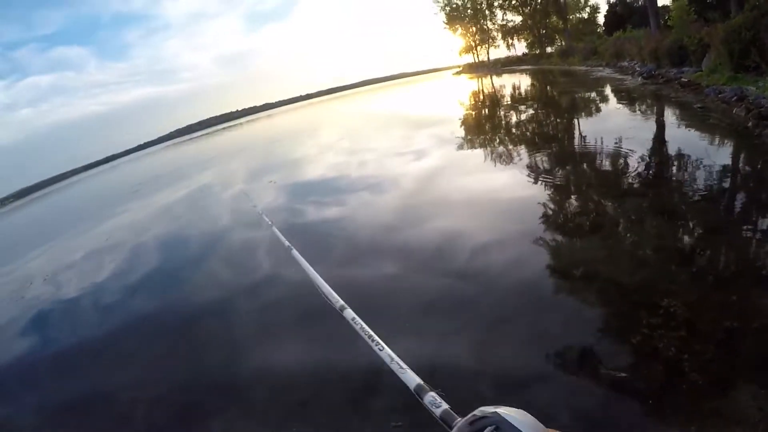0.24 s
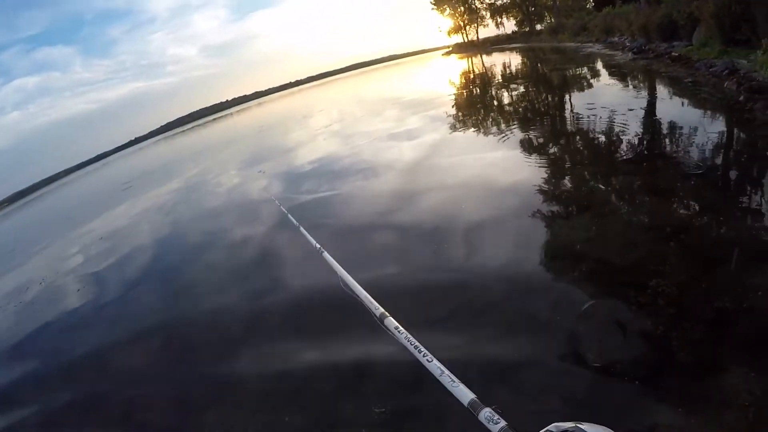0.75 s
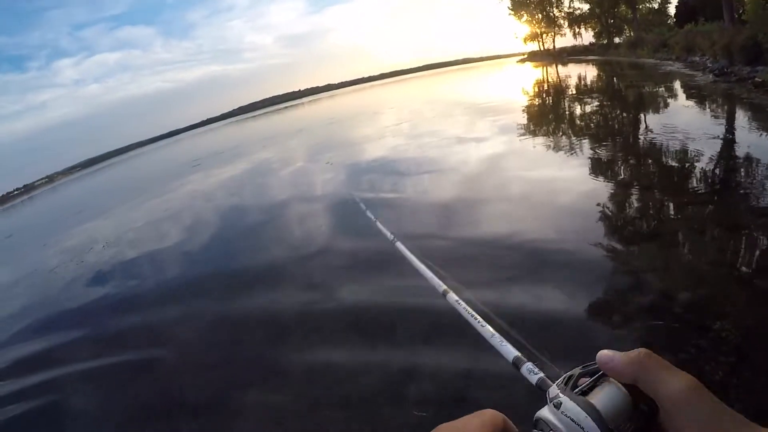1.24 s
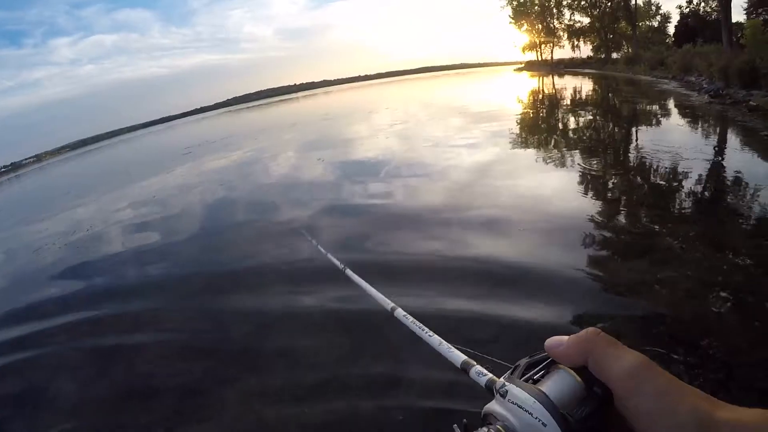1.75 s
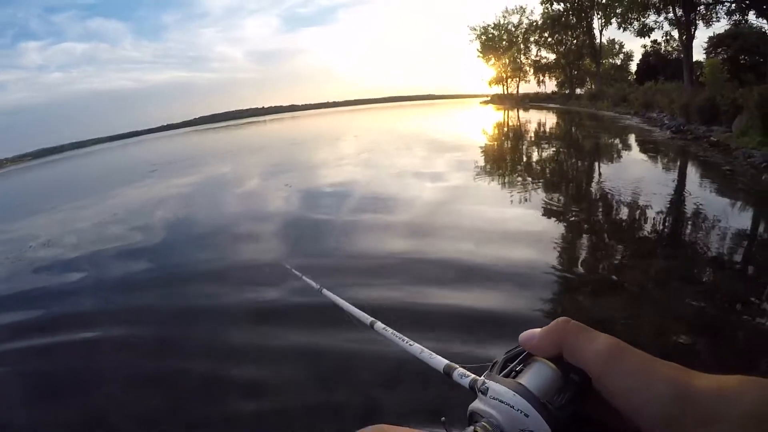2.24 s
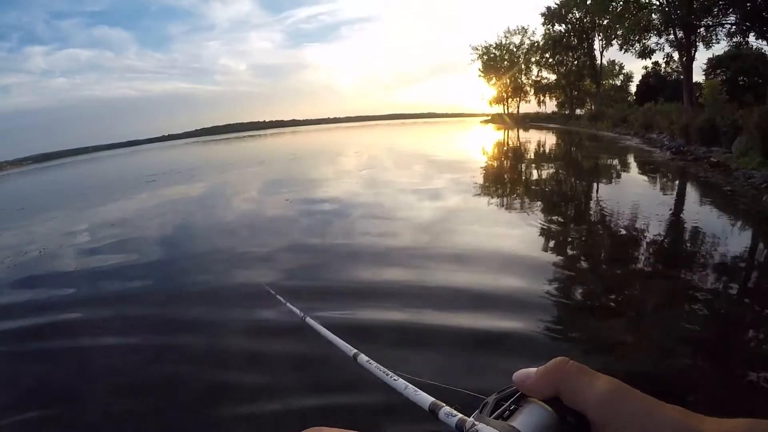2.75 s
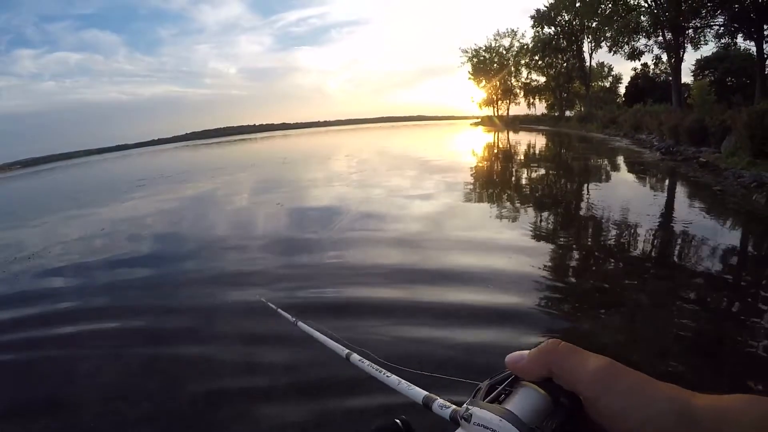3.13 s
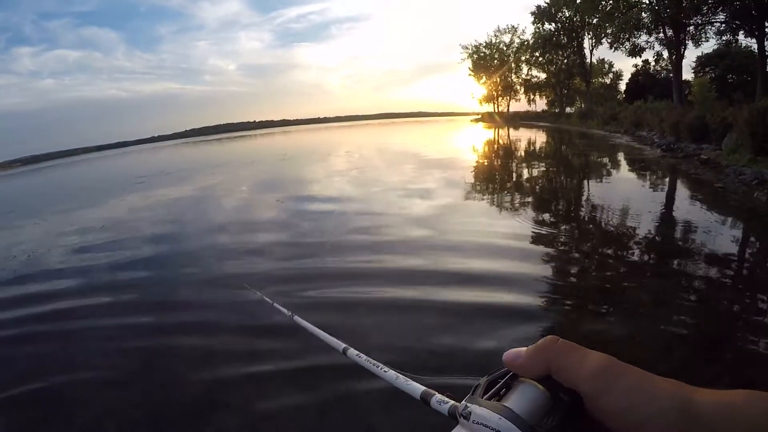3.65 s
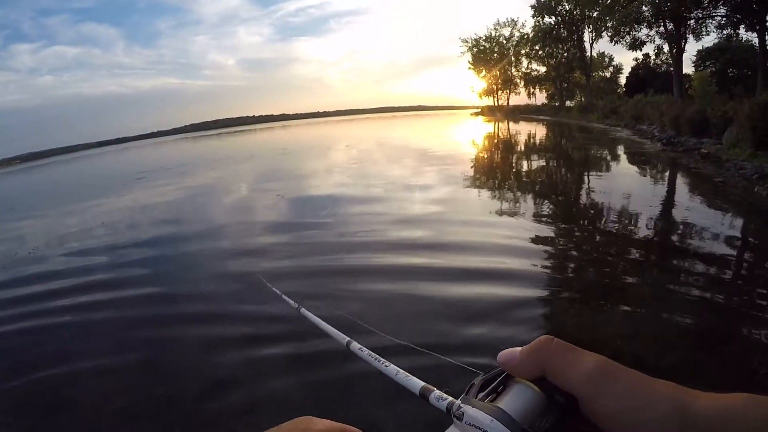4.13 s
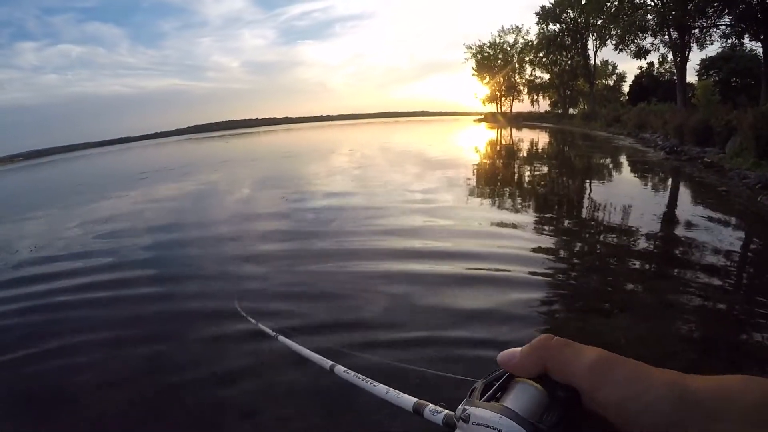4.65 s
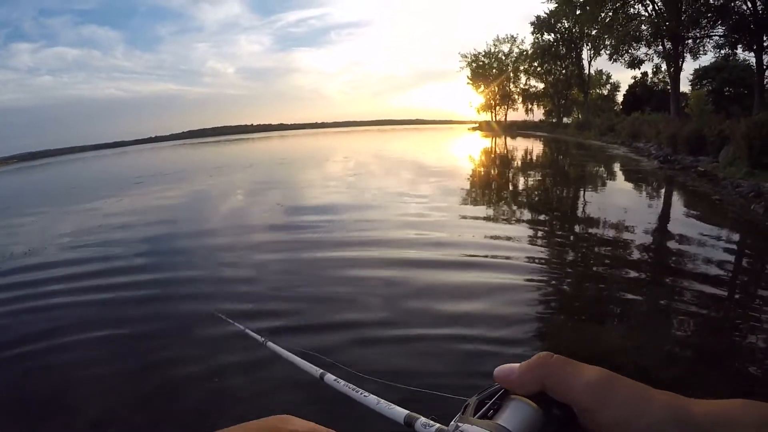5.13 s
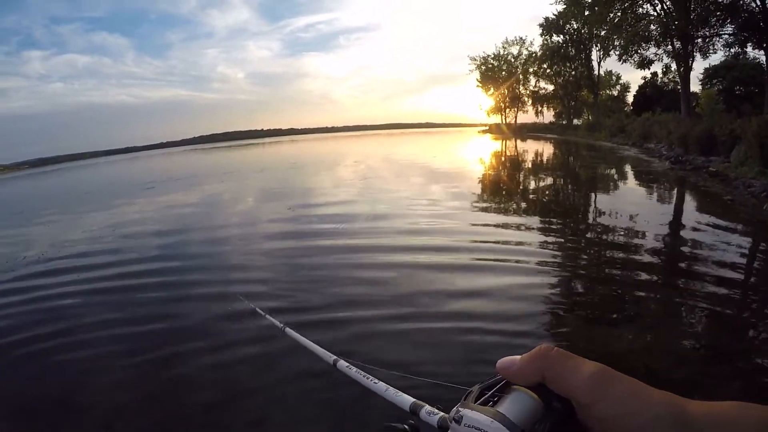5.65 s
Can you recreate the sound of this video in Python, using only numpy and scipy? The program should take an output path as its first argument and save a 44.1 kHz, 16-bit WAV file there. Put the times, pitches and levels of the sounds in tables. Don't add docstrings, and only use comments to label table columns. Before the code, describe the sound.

Water slops and drips off fishing tackle, a reel latch snaps sharply, then faint handle knocks and gear ticks under wind rumble and distant cicadas.

```python
import sys
import numpy as np
from scipy import signal
from scipy.io import wavfile
from scipy.ndimage import uniform_filter1d

SR = 44100
rng = np.random.default_rng(int(sys.argv[2]) if len(sys.argv) > 2 else 0)


def elevation(decibels):
    levels = np.asarray(decibels, float)
    return 10 ** (levels / 20)


def to_wav(s):
    ch = np.atleast_2d(s).T
    pcm = np.round(np.clip(ch, -1, 1) * 32767)
    wavfile.write(sys.argv[1], SR, pcm.astype(np.int16))


N = 259749

# (frequency [Hz], density [dB per Hz])
AIR_SPECTRUM = [(12, -30), (20, -1.5), (70, -0.5), (92, -4), (119, -4.5), (191, -13.5), (237, -13),
                (356, -19), (396, -19.5), (584, -26), (664, -27.5), (724, -28.5), (806, -27.5),
                (1410, -39.5), (3400, -46), (4420, -70), (7480, -120)]
# (time [s], wind level [dB])
GUSTS = [(0.0, -38), (0.57, -39), (0.7, -34.5), (1.4, -40.5), (1.6, -36.5), (1.88, -42.5), (2.66, -37.5),
         (3.1, -35.5), (3.33, -39), (3.65, -33.5), (3.84, -42), (4.04, -36.5), (4.2, -40), (4.82, -35),
         (5.28, -36.5), (5.77, -39), (5.89, -35)]
# (frequency [Hz], width [Hz], level [dB])
MOANS = [
    (68.7, 9.8, -49),
    (111.3, 5.3, -51),
    (237.7, 12.1, -58),
    (398.7, 9.4, -70.5),
]
# (frequency [Hz], density [dB per Hz])
HISS_SPECTRUM = [(1500, -14), (3000, 1), (10000, 7), (13000, 4), (15500, 1.5)]
# (frequency [Hz], density [dB per Hz])
CHORUS_SPECTRUM = [(3000, -35), (3400, -17), (3900, -13.5), (4150, -7.5), (4350, -6.5), (4650, -2.5),
                   (5400, -6), (6000, -2), (6650, 1), (7100, -3.5), (7700, -3.5), (8500, -8.5), (9300, -12),
                   (9900, -25), (10500, -34)]
# (time [s], level [dB], tilt [dB per octave])
CHORUS_SWELL = [(0.0, -55, 1), (0.28, -53, -1.5), (0.65, -51.5, -2), (2.1, -51.5, -0.5), (3.23, -50.5, 0),
                (5.35, -50.5, 0.5), (5.89, -51, -0.5)]
# (time [s], lead over the mean beat [throbs])
SONG_LEAD = [(0, -.35), (1, -.05), (2, .33), (3, .6), (3.8, .78), (4.5, .75), (5.89, .43)]
# (frequency [Hz], level [dB])
SONG_BANDS = [
    [(4678, -78), (5120, -69), (6325, -64.5), (6551, -70), (6751, -63.5), (7214, -72), (7725, -88)],
    [(4576, -69.5), (4640, -69.5), (6245, -90), (6659, -66), (6770, -74.5), (7230, -63.5), (7429, -69),
     (7768, -82)],
    [(4651, -67), (4813, -77), (5701, -67.5), (5879, -66), (6514, -74), (6700, -78), (7400, -70),
     (8027, -70.5)],
]
FACING_TIMES = [0.91, 2.75, 5.1]
# (frequency [Hz], density [dB per Hz])
WATER_SPECTRUM = [(180, -37), (300, -13), (376, -29), (405, -7.5), (605, -2.5), (871, -4.5), (950, -3.5),
                  (1320, -4.5), (1490, -7), (2150, -6.5), (2370, -10.5), (3460, -16), (6000, -14.5),
                  (7800, -48), (13200, -120)]
# (peak time [s], gurgle level [dB], drain t60 [s], spray level [dB])
SURGES = [
    (0.0, -51, 1.2, -74),
    (0.095, -49, 0.062, -70),
    (.128, -53, 0.62, -80),
    (.392, -49, 3.7, -77),
    (.488, -32.5, 0.066, -61),
    (.506, -40.5, 1.15, -65),
    (.698, -40.5, 0.54, -60),
    (0.865, -42, 0.31, -66),
    (.905, -48, 0.16, -77.5),
    (.94, -66, 0.41, -72),
]
# (time [s], peak level [dB], starting frequency [Hz], pitch rise [per t60])
DRIPS = [
    (.000, -41, 1700, .15),
    (.048, -40, 680, .05),
    (0.091, -27, 1174, .85),
    (.122, -39, 1500, 0.067),
    (.126, -32, 940, .21),
    (.160, -39, 1760, 0),
    (.203, -46, 1600, 0.26),
    (.229, -43.5, 1280, .1),
    (5.180, -48, 3400, 0.),
]
# (time [s], peak level [dB], frequency [Hz])
SMACKS = [(.033, -38, 2750), (.052, -39, 2700), (.089, -44, 2500), (.121, -40, 3000), (.147, -42, 3100),
          (.408, -38, 1870), (.4225, -29, 430), (.41, -43, 330), (.4595, -35, 5000), (.4765, -33.5, 2420),
          (.4765, -28, 3880), (.4765, -32, 1100), (.5267, -29.5, 2000), (.528, -26, 3900),
          (.5606, -30, 5000), (.58, -45, 2800), (.599, -39, 2900), (.638, -41, 3500), (.727, -34, 2800),
          (.7824, -37, 2600), (.8, -42, 3200), (.816, -31, 2500), (.8485, -41, 2800)]
# (time [s], peak level [dB], frequency [Hz])
SPITS = [(.0882, -35, 14300), (.1905, -48, 12000), (.4339, -49, 10100), (.4938, -39, 10100),
         (.5636, -45, 12100), (.7073, -41, 12700), (.7617, -49, 10400), (2.1986, -46, 13300),
         (5.5323, -50, 14300)]
# (time [s], peak level [dB], starting frequency [Hz])
BUBBLES = [(.385, -33.5, 860), (0.388, -35, 1200), (0.4068, -29, 1780), (.414, -31, 333),
           (.420, -29.5, 520), (.432, -27.5, 536), (.456, -29.5, 780), (.468, -32, 1700), (0.477, -29, 443),
           (.482, -24.5, 1500), (.489, -31, 724), (0.489, -30, 1500), (.501, -35, 340), (.506, -40, 2370),
           (.521, -32, 820), (.556, -30.5, 520), (0.559, -32, 1530), (.577, -33, 670), (.620, -33, 1190),
           (.637, -33, 2240), (.695, -23, 594), (.697, -33.5, 2900), (.719, -34, 2400), (0.73, -28, 1380),
           (.767, -37, 720), (.774, -30.5, 1620), (.815, -33, 1500), (.824, -34, 2900), (.870, -32, 1770)]
# (time [s], crack level [dB], body level [dB], crack t60 [s])
LATCH_BLOWS = [
    (.8661, -29, -50, 0.012),
    (.8846, -14.5, -50, 0.0059),
    (.8858, -15, -40, .020),
    (.8889, -6.5, -10.5, 0.0053),
    (.8905, -20, -11, 0.009),
    (.8972, -60, -16, .01),
]
# (frequency [Hz], density [dB per Hz])
CRACK_SPECTRUM = [(400, -33), (900, -7), (3100, 0.5), (4300, 0), (6000, -4), (8500, -2), (10000, -14),
                  (11900, -5), (14300, -16), (16000, -14)]
# (frequency [Hz], level [dB], t60 [s])
BODY_MODES = [(520, -28, 0.023), (670, -13, 0.043), (815, 7.5, 0.028), (914, -2, .07), (1053, -9, 0.076),
              (1187, -10.5, 0.06), (1500, -23, 0.023), (1830, 9.5, 0.0086), (2370, -3, 0.022),
              (2810, -2, .014), (3370, 7, 0.022)]
# (time [s], peak level [dB], frequency [Hz], width [share of frequency])
LATCH_TIPS = [
    (.8852, -17, 11800, .15),
    (.8853, -17, 8300, .2),
    (.8853, -17, 4300, .15),
    (.8887, -9, 5700, .12),
    (.898, -24, 1000, .2),
]
# (time [s], peak level [dB], frequency [Hz])
KNOCKS = [(.9413, -39, 2180), (1.4621, -46, 2410), (1.9794, -40, 2520), (2.2168, -39.5, 2480),
          (2.3361, -44, 1720), (2.4888, -38, 2620), (3.184, -46, 2200), (3.5468, -46, 1810),
          (4.2692, -46, 2290), (4.4628, -51, 1730), (4.7726, -49, 2170), (5.1397, -50, 2140),
          (5.5323, -48, 2050), (5.623, -43.5, 3100)]
# (time [s], peak level [dB])
GEAR_TICKS = [(1.2049, -57), (1.2223, -54), (1.6279, -48), (2.0874, -57), (2.1018, -54), (2.3323, -48),
              (2.5413, -44), (2.9284, -57), (2.9938, -50), (3.0277, -47), (3.2382, -58), (3.3031, -56),
              (3.8404, -54), (3.8972, -42), (4.2564, -56), (4.6735, -50), (4.8391, -57), (5.5315, -57),
              (5.6682, -52)]
# (time [s], level [dB], length [s])
RUBS = [(1.644, -62, 0.12), (2.097, -61, 0.071), (2.555, -65.5, .05), (2.952, -65, 0.044),
        (3.01, -65, 0.066), (3.44, -72, .05), (3.86, -68, 0.087), (4.286, -66, .08), (4.632, -66, .08),
        (4.846, -65, .04), (5.023, -62, .04)]
# (frequency [Hz], density [dB per Hz])
RUB_SPECTRUM = [(1200, -10), (2500, 1), (4000, 0), (9000, -13), (10500, -4), (12000, -15), (15000, -16)]


def evened(x):
    return x / np.sqrt(np.mean(x ** 2) + 1e-20)


def read(points, hz):
    f, value = np.transpose(points)
    return np.interp(np.log(hz + 1), np.log(f + 1), value)


def curve(rows, t, column=1):
    rows = np.array(rows)
    return np.interp(t, rows[:, 0], rows[:, column], -150, -150)


def add(mix, s, sound):
    part = mix[round(s * SR):][:len(sound)]
    part += sound[:len(part)]


def noise(colour, size, patch_db=0., patch_s=.1, patch_hz=300., tilt_db=0.):
    hop = size // 4
    hz = np.fft.rfftfreq(size, 1 / SR)
    real, imag, patches = rng.standard_normal((N // hop + 6, len(hz), 3)).T
    for _ in range(2):
        patches = uniform_filter1d(patches, 1 + int(patch_hz * size / SR), 0)
        patches = uniform_filter1d(patches, 1 + int(patch_s * SR / hop), 1)
    inside = (hz >= colour[0][0]) & (hz <= colour[-1][0])
    db = read(colour, hz)[:, None] + patch_db * evened(patches) + tilt_db
    spectra = (real + 1j * imag) * elevation(db) * inside[:, None]
    return evened(signal.istft(spectra, nperseg=size, noverlap=size - hop)[1][:N])


def whistle(hz, width_hz, waver=0.):
    r = np.exp(-np.pi * width_hz / SR)
    excitation = [1, 1j] @ rng.standard_normal((2, N))
    envelope = signal.lfilter([1], [1, -2 * r, r * r], excitation)
    wander = np.interp(np.arange(N), np.linspace(0, N, 16), rng.standard_normal(16))
    carrier = np.exp(2j * np.pi * hz * np.cumsum(1 + waver * wander) / SR)
    return evened((envelope * carrier).real)


def wind(t):
    air = noise(AIR_SPECTRUM, 4096, patch_db=1.0, patch_s=.15, patch_hz=40)
    rumble = signal.sosfiltfilt(signal.butter(2, 90, fs=SR, output="sos"), air)
    wash = air - rumble
    gust_db = curve(GUSTS, t)
    mean_db = gust_db.mean()
    wash_db = mean_db + 0.11 * (gust_db - mean_db) - 0.5
    moans = sum(elevation(db) * whistle(hz, width) for hz, width, db in MOANS)
    return elevation(gust_db - 0.05) * rumble + elevation(wash_db) * wash + moans


def cicadas(t):
    frames = np.arange(N // 1024 + 6) * 1024 / SR
    octaves = np.log2(np.fft.rfftfreq(4096, 1 / SR) / 6300 + 1e-9)[:, None]
    tilt_db = octaves * curve(CHORUS_SWELL, np.minimum(frames, CHORUS_SWELL[-1][0]), 2)
    far = noise(CHORUS_SPECTRUM, 4096, patch_db=2.8, patch_s=1.1, patch_hz=12, tilt_db=tilt_db)
    beat_hz = 11.7
    turns = beat_hz * t + curve(SONG_LEAD, t)
    throb = np.cos(2 * np.pi * turns) + .2 * np.cos(4 * np.pi * turns + .8)
    near = 0
    for k, bands in enumerate(SONG_BANDS):
        share = np.interp(t, FACING_TIMES, np.eye(3)[k])
        song = sum(elevation(db + 0.5) * whistle(hz, 31, waver=.0012) for hz, db in bands)
        near += np.sqrt(share) * song
    far_db = curve(CHORUS_SWELL, t) - 1.15 + 1.15 * throb
    return elevation(far_db) * far + elevation(2.2 * throb) * near


def microphone_hiss():
    return elevation(-70.5) * noise(HISS_SPECTRUM, 1024)


def surges(t):
    s, gurgle_db, t60, spray_db = np.transpose(SURGES)[:, :, None]
    rise_s, spray_hang = 0.026, 0.33
    run_dry_s, run_dry_db_per_s = 0.966, -58
    fall_db = -60 * np.maximum(t - s, 0) / t60 + run_dry_db_per_s * np.maximum(t - run_dry_s, 0)
    rise = np.clip(1 + (t - s) / rise_s, 0, 1) ** 2
    gurgle = np.linalg.norm(rise * elevation(gurgle_db + fall_db), axis=0)
    spray = np.linalg.norm(rise * elevation(spray_db + spray_hang * fall_db), axis=0)
    return gurgle, spray


def slop(t):
    tiny, ring_t = np.zeros(N), np.arange(900) / SR
    births = rng.random(N) < 3000 / SR
    size = elevation(3 * np.minimum(rng.exponential(1, N), 4)) * births
    kind = rng.integers(0, 30, N)
    for k, hz in enumerate(np.geomspace(300, 5000, 30)):
        grain = np.sin(2 * np.pi * hz * ring_t) * ring_t * hz * np.exp(-ring_t * hz / 1.6)
        level_db = read(WATER_SPECTRUM, hz) + 5.4 * np.log2(hz / 1000)
        tiny += elevation(level_db) * signal.oaconvolve(size * (kind == k), grain)[:N]
    rush = noise(WATER_SPECTRUM, 256, patch_db=3, patch_s=.006, patch_hz=500)
    fizz = noise([(3000, -10), (9000, 2), (11000, -1), (15500, -5)], 256)
    hollow = whistle(1520, 170) + elevation(-7) * whistle(2400, 200)
    gurgle, spray = surges(t)
    water = elevation(-4) * evened(tiny) + elevation(-8.0) * rush + elevation(-12.5) * hollow
    return gurgle * water + spray * fizz


def bubble(db, hz, rise, damp=1):
    t = np.arange(0, .1, 1 / SR)
    t60 = damp * 0.036 * (hz / 1000) ** -0.31
    envelope = elevation(db - 60 * t / t60) * (1 - np.exp(-t / 0.0016))
    return envelope * np.sin(2 * np.pi * hz * t * (1 + rise * t / t60))


def drips():
    out = np.zeros(N)
    for s, db, hz, rise in DRIPS:
        add(out, s, bubble(db, hz, rise))
    return out


def tick(db, hz, width):
    t = np.arange(400) / SR
    puff = rng.standard_normal(400) * t * np.exp(-t / .00012)
    resonance = t * np.exp(-2 * np.pi * width * hz * t) * np.sin(2 * np.pi * hz * t)
    sound = np.convolve(puff, resonance)
    return elevation(db) * sound / abs(sound).max()


def ticks(rows, width):
    out = np.zeros(N)
    for s, db, hz in rows:
        add(out, s, tick(db, hz, width))
    return out


def smacks():
    return ticks(SMACKS, 0.36)


def spits():
    return ticks(SPITS, 0.25)


def splash_bubbles():
    out = np.zeros(N)
    for s, db, hz in BUBBLES:
        add(out, s, bubble(db, hz, rise=0.16, damp=0.79))
    return out


def body_ring(t, soft):
    strike = rng.uniform(0.61, 1, len(BODY_MODES))
    ring = 0
    for gain, (hz, db, t60) in zip(strike, BODY_MODES):
        if soft:
            gain = gain / (1 + (hz / 1600) ** 4)
        rise = 1 - np.exp(-t * hz / 0.47)
        ring = ring + gain * elevation(db - 60 * t / t60) * rise * np.sin(2 * np.pi * hz * t)
    return ring


def latch():
    out, t = np.zeros(N), np.arange(0, .08, 1 / SR)
    crack = noise(CRACK_SPECTRUM, 256)
    for k, (s, crack_db, body_db, t60) in enumerate(LATCH_BLOWS):
        envelope = elevation(crack_db - 60 * t / t60) * (1 - np.exp(-t / 0.00043))
        ring = body_ring(t, soft=crack_db < -40)
        add(out, s, envelope * crack[k * len(t):][:len(t)] + elevation(body_db - 13.5) * ring)
    for s, db, hz, width in LATCH_TIPS:
        add(out, s, tick(db, hz, width))
    return out


def knocks():
    return ticks(KNOCKS, 0.37)


def gears():
    return ticks([(s, db, 10700 * (1 + .03 * rng.standard_normal())) for s, db in GEAR_TICKS], .17)


def handle(t):
    strokes = sum(elevation(db) * np.exp(-(2 * (t - s) / length) ** 2) for s, db, length in RUBS)
    slips = (rng.random(N) < 450 / SR) * rng.random(N)
    grain = 0.99 + evened(signal.oaconvolve(slips, np.hanning(50))[:N])
    return strokes * evened(grain * noise(RUB_SPECTRUM, 256))


def scene():
    t = np.arange(N) / SR
    mix = wind(t) + cicadas(t) + microphone_hiss()
    mix += slop(t) + drips() + smacks() + spits() + splash_bubbles()
    mix += latch() + knocks() + gears() + handle(t)
    return mix[None]


def top_cut(x):
    return signal.sosfilt(signal.butter(12, 16520, fs=SR, output="sos"), x)


def record(dry):
    dulled = signal.oaconvolve(dry, signal.firwin(201, 15400, fs=SR)[None], "same")
    return top_cut(dulled)


dry = scene()
out = record(dry)
to_wav(out)
```